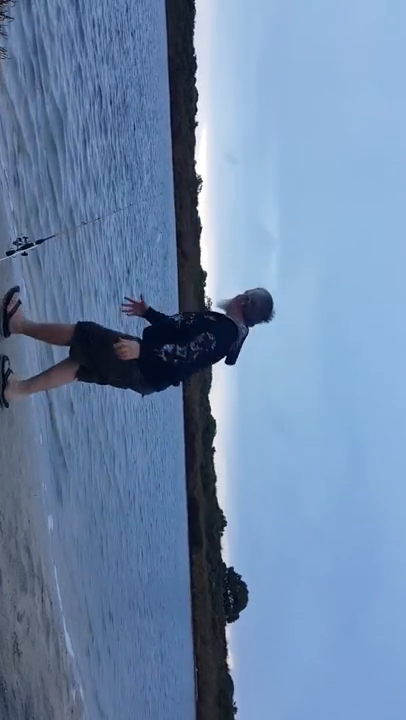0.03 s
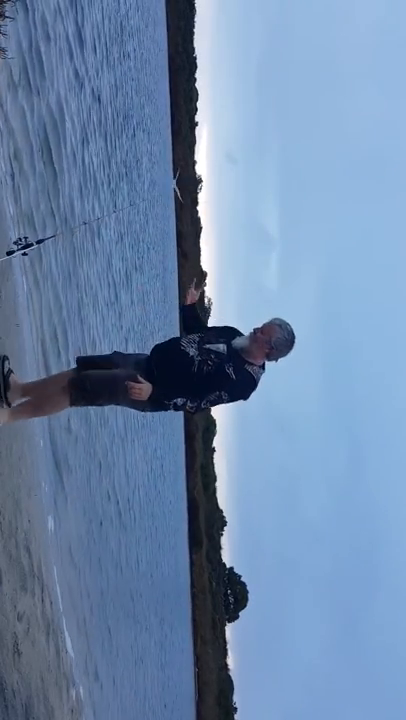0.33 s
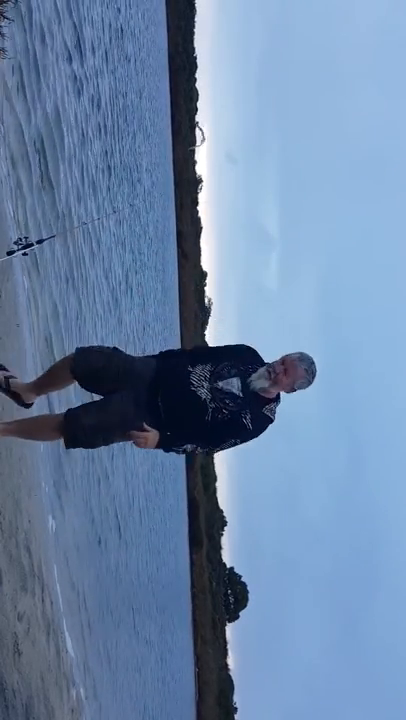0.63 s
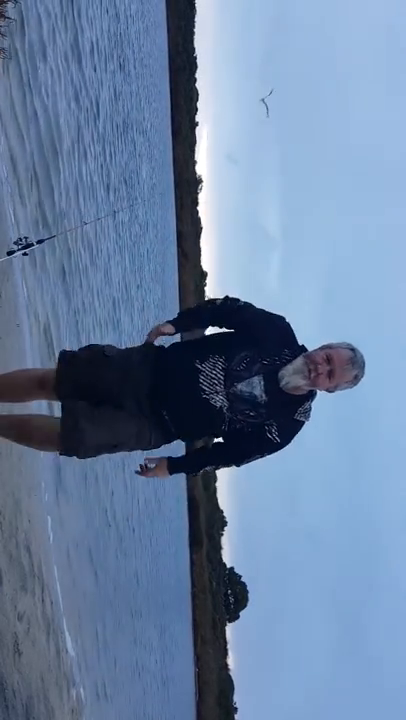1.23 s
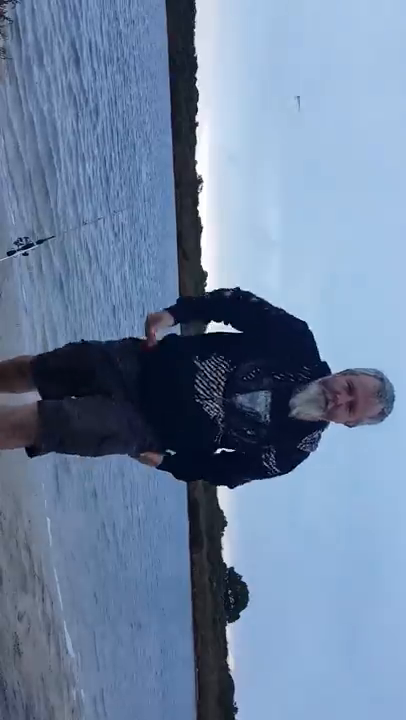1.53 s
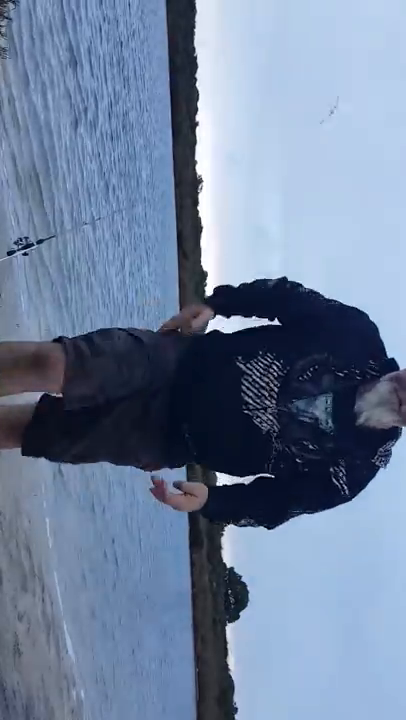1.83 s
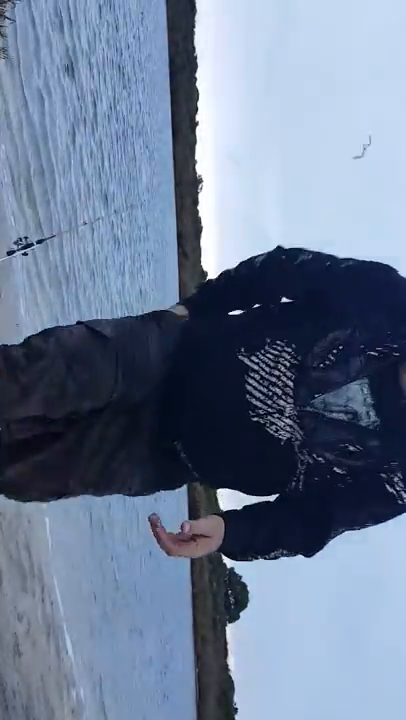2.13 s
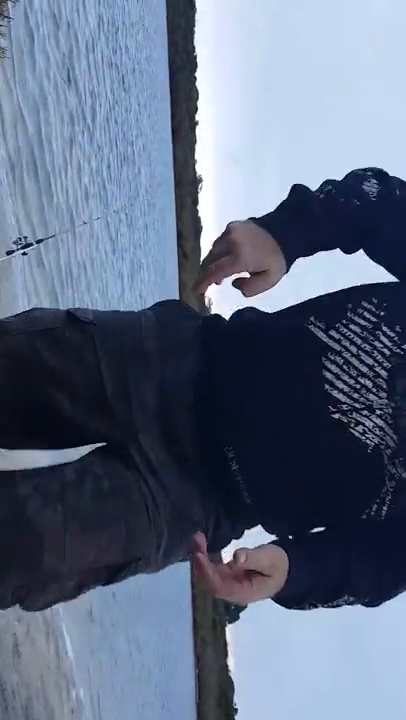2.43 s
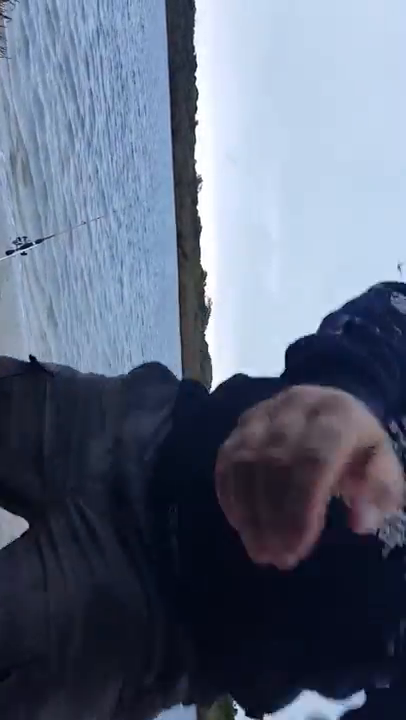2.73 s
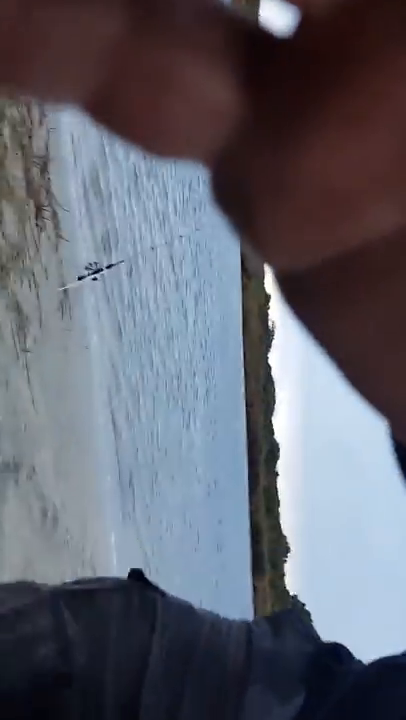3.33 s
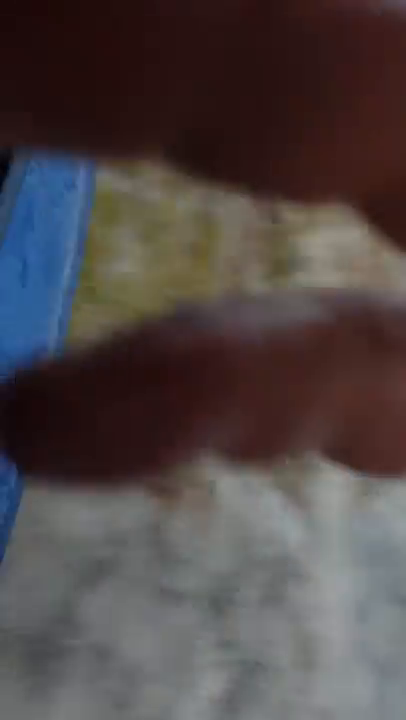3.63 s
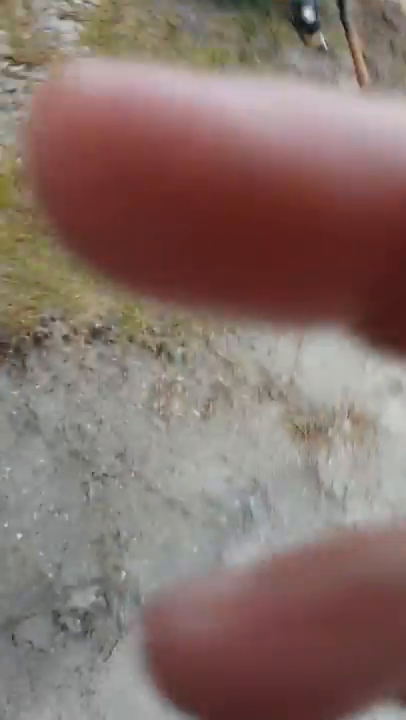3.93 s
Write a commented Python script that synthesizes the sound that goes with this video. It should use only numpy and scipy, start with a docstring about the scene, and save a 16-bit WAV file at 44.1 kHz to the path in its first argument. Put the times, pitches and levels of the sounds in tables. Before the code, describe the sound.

Footsteps in sandals approach on a sandy shore, followed by dull microphone handling bumps.

```python
"""Small waves hiss on a sandy shore throughout, and a breeze buffets the microphones in low puffs.
From the start someone in sandals walks up: each step grinds and sprays the sand, then the loose sole
slaps the heel; midway two flicked grains tick. With the last step a sleeve rustles as an arm reaches
out. From about 2.9 s a hand grips the camera: stick-slip friction rumbles through its case while
the fingers bump it and rasp across it."""
import sys
import numpy as np
from scipy import signal
from scipy.fft import rfft, irfft
from scipy.io import wavfile
from scipy.ndimage import uniform_filter1d

SR = 44100
rng = np.random.default_rng(int(sys.argv[2]) if len(sys.argv) > 2 else 0)


def dump_mix(stems):
    """Bounce the given channels to the path in sys.argv[1] as a 16-bit WAV at rate SR."""
    frames = np.atleast_2d(stems).T  # one column per channel
    limited = np.clip(frames, -1, 1)  # hard clip at full scale
    pcm = np.round(limited * 32767).astype(np.int16)
    wavfile.write(sys.argv[1], SR, pcm)


N = 176400
TIME, FREQS = np.arange(N) / SR, np.fft.rfftfreq(N, 1 / SR)


def amp(db):
    """Amplitude ratio of a level in decibels."""
    return 10 ** (np.asarray(db) / 20)


def unit_power(x):
    """Normalisation to a mean square of one."""
    return x / np.sqrt(np.mean(x ** 2) + 1e-20)


def at_frequency(points, hz):
    """Interpolation on a logarithmic frequency axis."""
    f, value = np.transpose(points)
    return np.interp(np.log(hz + 1), np.log(f), value)


def envelope(points):
    """Amplitude envelope, interpolated in decibels."""
    return amp(np.interp(TIME, *np.transpose(points)))


def colour(x, spectrum):
    """Spectral shaping at unit power, falling 12 dB per octave beyond the spectrum's ends."""
    hz = FREQS + 1
    skirts = np.minimum(np.minimum(hz / spectrum[0][0], spectrum[-1][0] / hz), 1) ** 2
    return unit_power(irfft(rfft(x) * amp(at_frequency(spectrum, FREQS)) * skirts, N))


def resonance(x, hz, octaves=0.27):
    """Band-pass response of one broad resonance, at unit power."""
    detuning = np.log2((FREQS + 1) / hz) / octaves
    return unit_power(irfft(rfft(x) / (1 + detuning ** 2), N))


def drift(hz):
    """Slow random modulation: low-pass noise at unit power."""
    return unit_power(irfft(rfft(rng.standard_normal(N)) * np.exp(-(FREQS / hz) ** 2), N))


def patches(shape, bins, frames):
    """Random modulation, correlated over neighbouring frequencies and moments."""
    field = uniform_filter1d(rng.standard_normal(shape), bins, axis=0)
    return unit_power(uniform_filter1d(field, frames, axis=1))


def impulses(per_s, spread_db=0, shared=0):
    """Shot noise in stereo; a share of its power is common to both channels."""
    clicks = (rng.random((3, N)) < per_s / SR) * rng.choice([-1, 1], (3, N))
    clicks = clicks * amp(spread_db * np.minimum(rng.exponential(1, (3, N)), 4))
    return np.sqrt(1 - shared) * clicks[:2] + np.sqrt(shared) * clicks[2]


def stroke(start, rise, hold, release=0.016):
    """Envelope of sustained contact: linear rise, hold, exponential decay."""
    t = TIME - start
    return np.clip(t / rise, 0, 1) * np.exp(-np.maximum(t - rise - hold, 0) / release)


def pulse(at, swell, decay):
    """Envelope of a transient: exponential growth to a peak, then exponential decay."""
    t = TIME - at
    return np.exp(-np.minimum(np.maximum(-t / swell, t / decay), 40))


def thud(at, swell, decay, hz):
    """Damped oscillation of random phase."""
    return np.sqrt(2) * pulse(at, swell, decay) * np.sin(2 * np.pi * (hz * (TIME - at) + rng.random()))


def pan(left_db):
    """Level difference of the left channel over the right, as two gains."""
    return amp(np.array([[left_db], [-left_db]]) / 2)


# Spectrum of the wash (frequency [Hz], relative density [dB])
WAVE_SPECTRUM = [(30, -19), (68, 1.5), (120, -16.5), (230, -13), (420, 2), (740, -6), (1150, -4.5),
                 (1550, -16.5), (2050, -15.5), (2800, -23.5), (3900, -20), (7000, -28.5), (8800, -42.5),
                 (15500, -44)]
# Likeness of the wash at the two microphones (frequency [Hz], coherence [0-1])
WAVE_COHERENCE = [(120, 1), (400, 0.97), (1400, 0.25), (7000, 0.072)]


def waves(level_db=-51.5, patchy_db=2.1, lap_db=1.76, lag_s=0.00005):
    """Small waves are a distributed source: their noise loses coherence as frequency rises."""
    hz, _, (left, unrelated) = signal.stft(rng.standard_normal((2, N)), SR, nperseg=1024)
    coherence = at_frequency(WAVE_COHERENCE, hz)[:, None]
    right = coherence * left + np.sqrt(1 - coherence ** 2) * unrelated
    right *= np.exp(-2j * np.pi * hz * lag_s)[:, None]
    shimmer = amp(patchy_db * patches(right.shape, bins=9, frames=6))
    wash = signal.istft(np.array([left, right]) * shimmer, nperseg=1024)[1][:, :N]
    return colour(wash, WAVE_SPECTRUM) * amp(level_db + lap_db * drift(hz=35.7)) * pan(left_db=1)


# Strength of the breeze (time [s], level [dB])
BREEZE_LEVEL = [(0, -56.5), (.5, -47.5), (.68, -56), (1.0, -55.5), (1.3, -63), (2.85, -61)]
# Puffs of wind (time [s], level [dB])
WIND_PUFFS = [(.01, -36), (0.078, -36), (0.244, -51), (.385, -41), (.572, -47.5), (0.814, -48.5),
              (0.875, -40.5), (2.044, -48.5)]
# Spectrum of the buffeting (frequency [Hz], relative density [dB])
EDDY_SPECTRUM = [(20, -9.5), (100, 1.5), (170, -2.5), (450, -14.5), (2000, -102)]


def breeze(lumpy_db=2, puff_s=0.029, push_db=-3):
    """Turbulent pressure: eddies strike each microphone separately, and each puff pushes both alike."""
    eddies = impulses(per_s=6600, spread_db=1.5)
    eddies *= amp(lumpy_db * np.array([drift(hz=34) for _ in range(2)]))
    pushes = sum(amp(db + push_db) * thud(at, puff_s / 2, puff_s / 2, hz=110) for at, db in WIND_PUFFS)
    puffs = sum(amp(db) * pulse(at, puff_s, puff_s) for at, db in WIND_PUFFS)
    return pushes + colour(eddies, EDDY_SPECTRUM) * (envelope(BREEZE_LEVEL) + puffs)


# Flicked grains and bits of shell landing (time [s], level [dB])
GRAIN_LANDINGS = [(1.231, -53), (1.377, -48.5)]


def grain_ticks():
    """Impact of a small hard body: a coarse grain rings high and briefly."""
    ring = resonance(rng.standard_normal((2, N)), hz=5670)
    return ring * sum(amp(db) * pulse(at, swell=0.0005, decay=0.003) for at, db in GRAIN_LANDINGS)


def shifting_sand(per_s, depth_db=3):
    """Grain collisions, coloured by brief resonances that come and go as the sand shifts."""
    spectra = signal.stft(impulses(per_s), nperseg=256)[2]
    spectra *= amp(depth_db * patches(spectra.shape[1:], bins=3, frames=10))
    return unit_power(signal.istft(spectra, nperseg=256)[1][:, :N])


# Foot pressing or scuffing the sand (time [s], rise [s], hold [s], crunch level [dB], grit level [dB])
FOOTFALLS = [(0, 0.0016, 0.016, -57.5, -57), (0.363, 0.0023, 0.0036, -63, -50),
             (0.418, 0.0029, 0.0052, -46, -51.5), (0.454, 0.025, 0.013, -56.5, -74),
             (0.926, 0.0013, 0.041, -45, -53.5), (0.96, 0.025, 0.085, -60, -58),
             (1.41, 0.01, 0.049, -50.5, -54.5), (1.483, 0.064, 0.007, -59, -51.5),
             (1.969, 0.021, 0.12, -57.5, -58.5), (2.663, 0.0027, 0.093, -57, -64)]
# Spectrum of grinding sand (frequency [Hz], relative density [dB])
CRUNCH_SPECTRUM = [(300, -51), (900, 4), (1550, -4), (2200, 5.5), (3000, -4.5), (4000, 0), (6000, -11),
                   (9000, -66)]
# Hiss of fine grit, also of cloth and skin (frequency [Hz], relative density [dB])
HISS_SPECTRUM = [(2500, 0.5), (4500, 2), (7300, 3.5), (8700, -2), (11500, 0), (15500, -1.5)]


def footsteps(clump_db=1.5, trickle_db=-11.5, trickle_s=0.73):
    """Granular friction: sand grinds under the sole, fine grit sprays, and loose sand trickles on."""
    crunch_power, grit_power = np.zeros(N), np.zeros(N)
    for start, rise, hold, crunch_db, grit_db in FOOTFALLS:
        press = stroke(start, rise, hold)
        trickle = amp(trickle_db) * stroke(start, rise, hold, trickle_s)
        crunch_power += (press * amp(crunch_db)) ** 2
        grit_power += (press ** 2 + trickle ** 2) * amp(grit_db) ** 2
    crunch = colour(shifting_sand(per_s=1000), CRUNCH_SPECTRUM) * np.sqrt(crunch_power)
    grit = colour(shifting_sand(per_s=3000), HISS_SPECTRUM) * np.sqrt(grit_power)
    return (crunch + grit) * amp(clump_db * drift(hz=79))


# Sole meeting heel (time [s], swell and decay [s], level [dB], pitch [Hz], relative snap level [dB])
HEEL_SLAPS = [(.253, 0.0012, -35.5, 424, -31), (0.6973, 0.00094, -36.5, 940, -14),
              (1.133, 0.0023, -44, 560, 6), (1.729, 0.0033, -43, 740, 8), (2.079, 0.0011, -36.5, 547, -13),
              (2.6678, 0.00079, -28, 510, -18)]
# Spectrum of the snap (frequency [Hz], relative density [dB])
SNAP_SPECTRUM = [(400, 11), (1000, 0.5), (2200, -4.5), (3000, -12), (7000, -23)]


def sandals():
    """Heavily damped impact: the loose sole claps the heel with a dry pop and a broadband snap."""
    snap = colour(rng.standard_normal((2, N)) + rng.standard_normal(N), SNAP_SPECTRUM)
    out = np.zeros((2, N))
    for at, length, db, hz, snap_db in HEEL_SLAPS:
        pop = thud(at, length, length, hz)
        out += amp(db) * (pop + amp(snap_db) * snap * pulse(at, length, length))
    return out


def sleeve(start_s=2.62, rise_s=0.1, level_db=-60.5):
    """Friction noise of cloth: a soft, unbroken hiss once the arm reaches out."""
    reach = np.clip((TIME - start_s) / rise_s, 0, 1)
    return colour(rng.standard_normal((2, N)), HISS_SPECTRUM) * reach * amp(level_db)


# Skin sliding on the case (time [s], rise [s], hold [s], rasp level [dB], ring [Hz], ring level [dB])
FINGER_SLIDES = [(3.143, 0.01, 0.023, -47.5, 7000, -53.5), (3.25, 0.08, 0.0076, -54, 7600, -61),
                 (3.36, 0.0048, 0.0036, -50, 3320, -61), (3.72, 0.0024, 0.009, -48, 4270, -51),
                 (3.79, 0.055, 0.013, -47, 1780, -48), (3.824, 0.028, 0.12, -52.5, 3660, -52.5)]
# Spectrum of rubbing skin (frequency [Hz], relative density [dB])
RASP_SPECTRUM = [(700, -2), (1900, -3), (2800, -7.5), (4200, -8), (9000, -22.5)]


def finger_slides(hiss_db=-5):
    """Sliding friction: skin rasps over the case, and tiny slips excite one resonance per stroke."""
    rasp = colour(impulses(per_s=4800, spread_db=2.5), RASP_SPECTRUM)
    rasp += amp(hiss_db) * colour(rng.standard_normal((2, N)), HISS_SPECTRUM)
    slips = impulses(per_s=2000, spread_db=1)
    return sum(stroke(start, rise, hold) * (amp(rasp_db) * rasp + amp(ring_db) * resonance(slips, hz))
               for start, rise, hold, rasp_db, hz, ring_db in FINGER_SLIDES)


# Rumble of the hand pressing and rubbing the case (time [s], level [dB])
GRIP_LEVEL = [(2.87, -40), (2.94, -34.5), (3.08, -48), (3.125, -23), (3.19, -36.5), (3.225, -27.5),
              (3.29, -32), (3.405, -34.5), (3.45, -28), (3.66, -29), (3.75, -38.5)]
# Response of the case to slips and bumps (frequency [Hz], relative density [dB])
CASE_SPECTRUM = [(20, -8.5), (110, 3), (175, -3.5), (360, -3), (510, -9), (690, -20), (1200, -37.5),
                 (3000, -44.5)]


def grip(clump_db=2.5):
    """Stick-slip friction: each slip of the skin sends a dull pulse through the case."""
    slips = impulses(per_s=750, spread_db=3, shared=0.055) * amp(clump_db * drift(hz=35.6))
    touching = TIME > GRIP_LEVEL[0][0]
    return colour(slips, CASE_SPECTRUM) * envelope(GRIP_LEVEL) * touching


# Fingers striking the case (time [s], level [dB], pitch [Hz], left over right [dB], relative click [dB])
FINGER_BUMPS = [(2.934, -21.5, 122, -2, -31), (2.954, -25, 310, -3, -34), (3.033, -38.5, 845, -5, 3.5),
                (3.126, -20, 270, -2, -24), (3.155, -30, 217, -7, 0.5), (3.165, -16.5, 412, -9, -15),
                (3.229, -22.5, 260, -1, -39), (3.263, -27.5, 360, 5.5, -8.5), (3.486, -26.5, 340, 8, -12.5),
                (3.542, -17, 406, 9, -10), (3.598, -17, 169, 11.5, -5.5), (3.609, -27.5, 446, 18, -11),
                (3.667, -27, 99, 0, -38), (3.887, -25, 383, -13, -12)]
# Spectrum of the contact click (frequency [Hz], relative density [dB])
CLICK_SPECTRUM = [(500, 13), (1400, 1.5), (2300, -16)]


def finger_bumps(thud_db=-3, shudder_db=-7, swell_s=0.0035, decay_s=0.005, lag_s=0.00044):
    """Structure-borne impact: a fingertip gives a thud, a dull click and a shudder of the case."""
    shudder = amp(shudder_db) * colour(impulses(per_s=3400, spread_db=4.5, shared=0.32), CASE_SPECTRUM)
    click = colour(rng.standard_normal(N), CLICK_SPECTRUM)
    out = np.zeros((2, N))
    for at, db, hz, left_db, click_db in FINGER_BUMPS:
        contact = pulse(at, swell_s, decay_s)
        left = amp(thud_db) * thud(at, swell_s, decay_s, hz) + amp(click_db) * click * contact
        right = np.interp(TIME - lag_s * np.sign(left_db), TIME, left)  # the nearer side hears it first
        out += amp(db) * pan(left_db) * (np.array([left, right]) + shudder * contact)
    return out


def scene():
    """Superposition in the open air: shore, walker and hand add without reflections."""
    shore = waves() + breeze()
    walker = footsteps() + sandals() + grain_ticks()
    hand = sleeve() + grip() + finger_bumps() + finger_slides()
    return shore + walker + hand


def record(dry, cutoff_hz=15850):
    """Band limiting: a steep low-pass filter removes the highest treble."""
    lowpass = signal.firwin(511, cutoff_hz, window=("kaiser", 9), fs=SR)
    return signal.oaconvolve(dry, lowpass[None], "same")


dry = scene()
out = record(dry)
dump_mix(out)
```